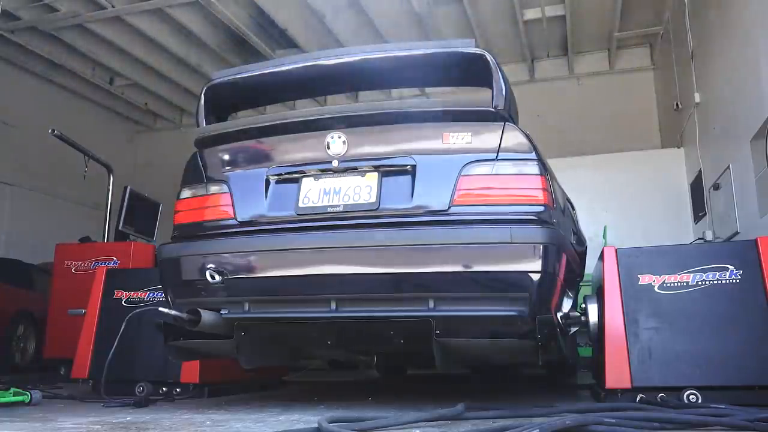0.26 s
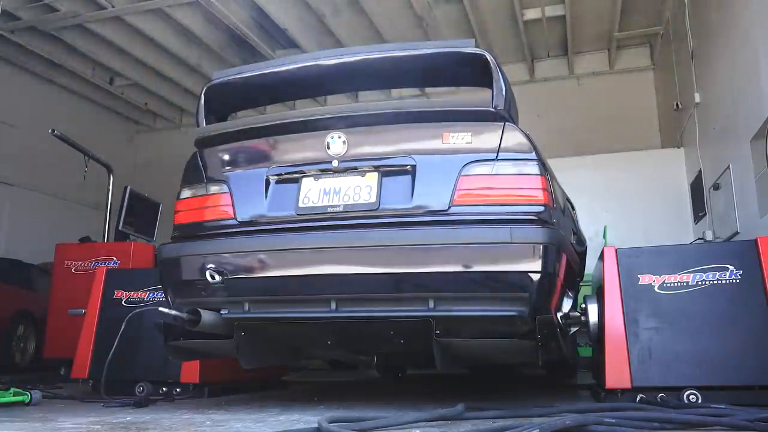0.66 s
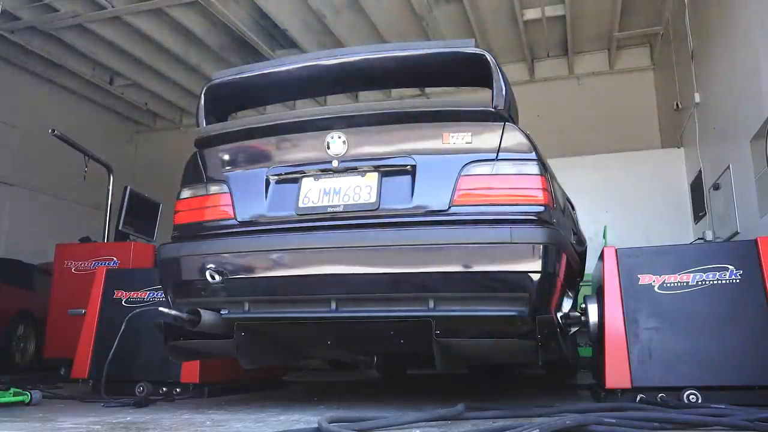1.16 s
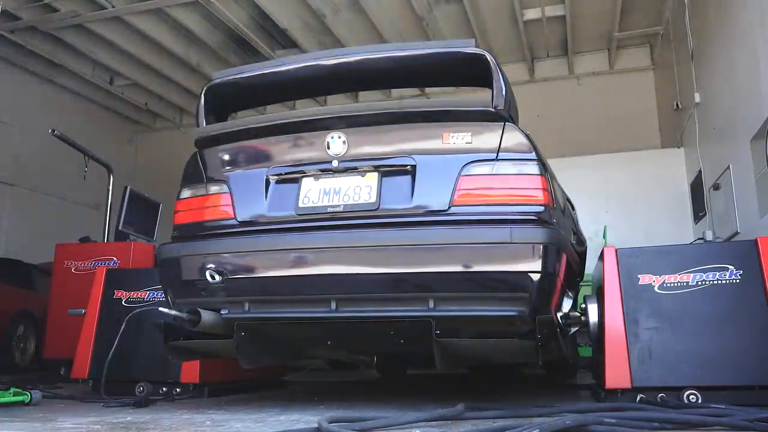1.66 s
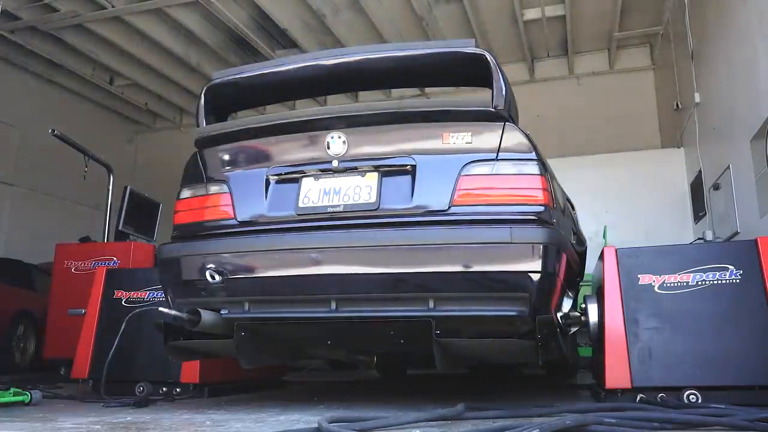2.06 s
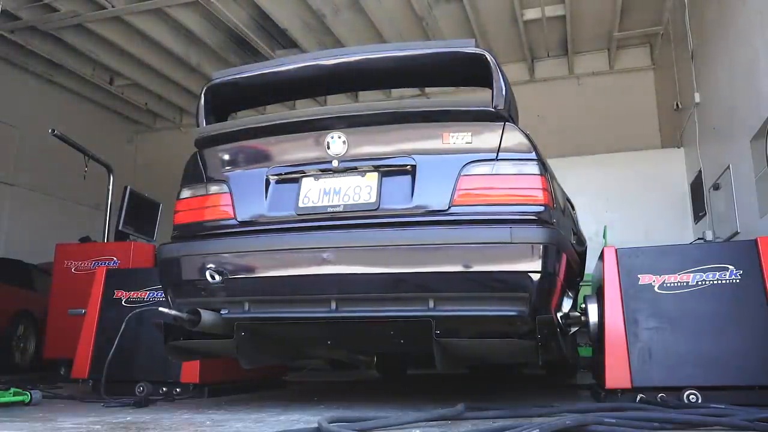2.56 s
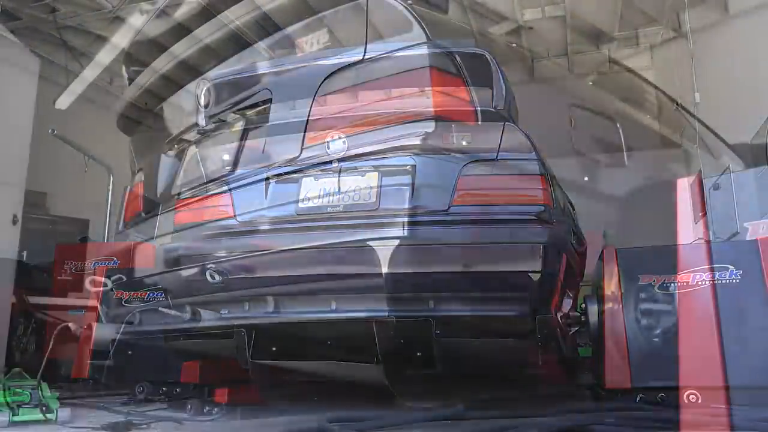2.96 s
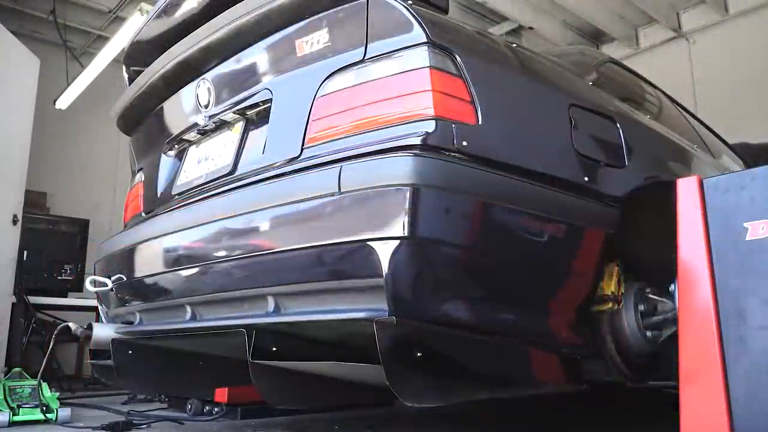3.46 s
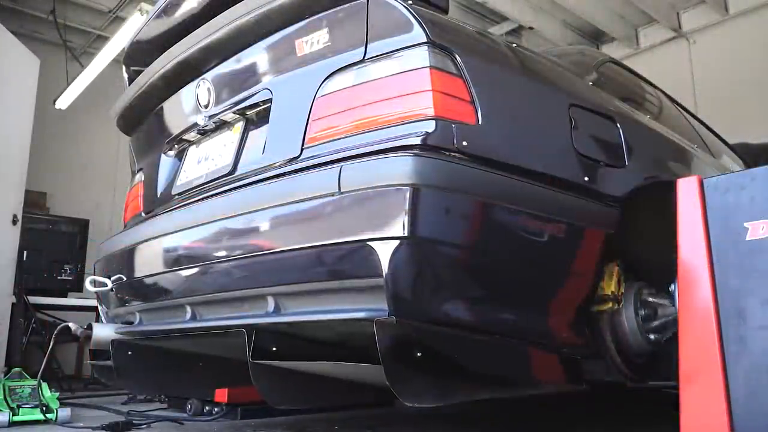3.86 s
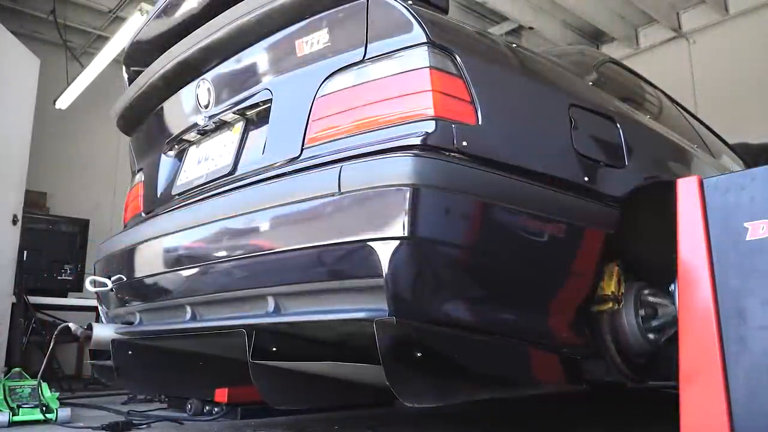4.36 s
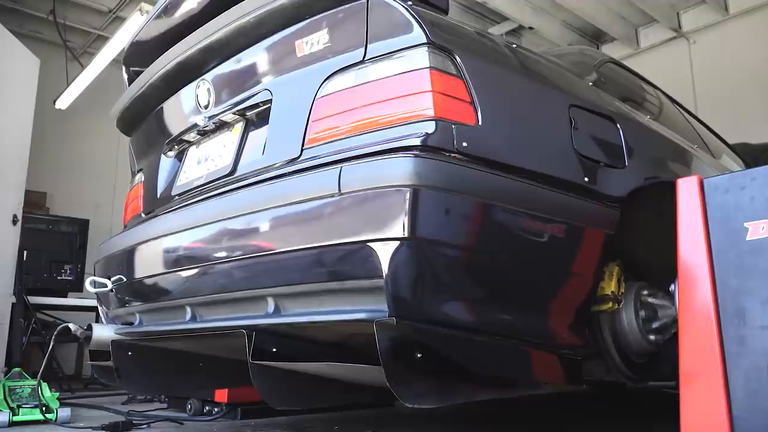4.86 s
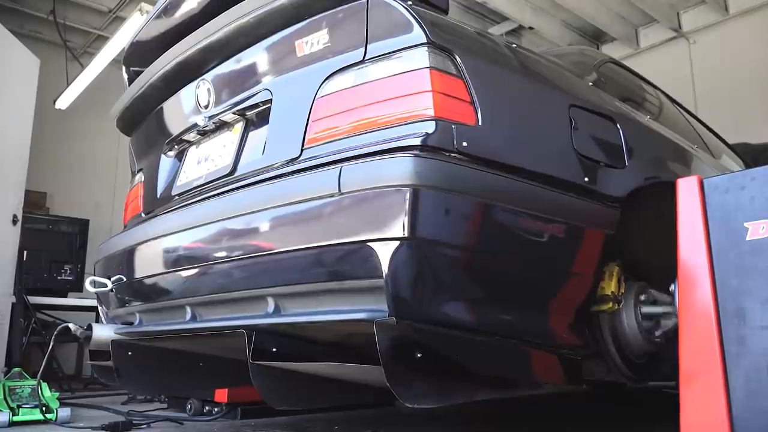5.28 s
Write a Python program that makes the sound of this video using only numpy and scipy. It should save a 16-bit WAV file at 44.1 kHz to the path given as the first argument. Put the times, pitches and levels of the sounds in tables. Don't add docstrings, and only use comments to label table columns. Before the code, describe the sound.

Close behind the tailpipe of a turbocharged six-cylinder car on a workshop dynamometer, with steady cooling-fan airflow underneath. From 0 s the loud exhaust note falls quickly, burbling unevenly, with dense dry crackles until about 1.2 s. A very faint high turbine tone slides down around 0.3-1.2 s, and tiny metallic ticks cluster near 1 s. By 1.5 s it is a low, lumpy idle with hollow pipe pops, soft wind thumps on the microphone, a heavy gust near 1.9 s and a faint motor whine rising and sinking at 1.6-2.4 s. Between 2.4 and 3.15 s a second, closer run crossfades in, with a few snaps around 3 s and a sharp one near 3.5 s. The smoother, fuller engine note climbs under load, hissing and buzzing, with hard cracks from 4 s and a brief gear whine around 4.4 s. It peaks at 4.75 s, roaring and clipped, then drops slightly and holds until the end at about 5.5 s.

```python
import sys
import numpy as np
from scipy import signal
from scipy.fft import rfft, irfft
from scipy.io import wavfile
from scipy.ndimage import map_coordinates

SR = 44100
rng = np.random.default_rng(int(sys.argv[2]) if len(sys.argv) > 2 else 0)


def invert_db(level):
    return 10 ** (np.asarray(level, dtype=float) / 20)


def master(y):
    cut = np.clip(np.atleast_2d(y).T, -1, 1)
    pcm = np.round(cut * 32767)
    wavfile.write(sys.argv[1], SR, pcm.astype(np.int16))


N = 243431
TIME = np.arange(N) / SR
MID_HZ, MID_DB = 100, -25


def unit(x):
    return x / np.sqrt(np.mean(x ** 2) + 1e-20)


def along(points, hz):
    point_hz, value = np.transpose(points)
    return np.interp(np.log(hz + 1), np.log(point_hz + 1), value)


def curves(rows):
    s, *columns = np.transpose(rows)
    return [np.interp(TIME, s, column) for column in columns]


def during(rows):
    inside_s = np.minimum(TIME - rows[0][0], rows[-1][0] - TIME)
    return np.clip(inside_s / 0.18, 0, 1)


def wobble(rate_hz):
    knots = rng.standard_normal(int(N * rate_hz / SR) + 4)
    return map_coordinates(knots, [TIME * rate_hz], order=1)


def coloured(x, spectrum):
    size = 2 ** 14
    gain = invert_db(along(spectrum, np.fft.rfftfreq(size, 1 / SR)))
    cepstrum = irfft(np.log(gain + 1e-6))
    cepstrum[1:size // 2] *= 2
    cepstrum[size // 2 + 1:] = 0
    return signal.fftconvolve(x, irfft(np.exp(rfft(cepstrum))))[:N]


def band(x, kind, hz):
    return signal.sosfiltfilt(signal.butter(2, hz, kind, fs=SR, output="sos"), x)


def running(rows):
    log_hz = curves([(s, np.log(hz)) for s, hz, _ in rows])[0]
    return np.exp(log_hz), curves(rows)[1]


def rings(events, t60_s, attack_s, rise=0):
    out, t = np.zeros(N + SR), np.arange(SR // 4) / SR
    bent = t - rise * 0.016 * (1 - np.exp(-t / 0.013))
    for s, db, hz in events:
        envelope = invert_db(db - 60 * t / t60_s) * (1 - np.exp(-t / attack_s))
        out[round(s * SR):][:len(t)] += envelope * np.sin(2 * np.pi * hz * bent)
    return out[:N]


def whistle(rows, blur_hz, rate_hz):
    hz, db = curves(rows)
    cycles = np.cumsum(hz + blur_hz * wobble(rate_hz)) / SR
    return during(rows) * invert_db(db + 4.5) * np.sin(2 * np.pi * cycles)


def snaps(events, shape, gain_db):
    s, db = np.transpose(events)
    pulses = np.bincount((s * SR).astype(int), invert_db(db + gain_db), N)
    around_s = np.arange(-SR // 100, SR // 100 + 1) / SR
    return signal.fftconvolve(pulses, shape(around_s), "same")


# start_s, second_share [0-1]
FADE = [(2.42, 0.02), (3.15, 0.94)]


def second_share():
    return curves(FADE)[0]


# freq_hz, t60_s
SHOP = [(100, 0.64), (1000, 0.37), (8000, 0.5)]


def shop(x):
    hz, t, z = signal.stft(rng.standard_normal(SR // 2), SR, nperseg=256)
    decay = invert_db(-60 * t / along(SHOP, hz)[:, None])
    tail = signal.istft(z * decay, SR, nperseg=256)[1]
    return signal.fftconvolve(x, tail / np.linalg.norm(tail))[:N]


# freq_hz, level_db [dB per Hz]
FANS = [(350, -32.5), (600, -5.5), (634, -6), (726, -28), (1230, -13.5), (1560, -10.5), (2070, -18),
        (2870, -17), (3120, -17.5), (3520, -14.5), (4260, -25.5), (5160, -23), (6860, -36.5), (7450, -29),
        (15500, -47)]


def fans():
    level_db = -53.5 + 0.65 * wobble(16)
    return invert_db(level_db) * unit(coloured(rng.standard_normal(N), FANS))


# start_s, peak_db, pitch_hz
TICKS = [(0.16, -55, 12500), (0.1925, -56, 12600), (0.9138, -47, 11400), (0.9921, -49, 11100),
         (1.0176, -48, 12500), (1.0735, -46, 11500), (1.1174, -57, 10900), (1.1613, -46, 11400),
         (1.3, -50, 8000), (1.385, -55, 8100)]


def ticks():
    return rings(TICKS, t60_s=0.01, attack_s=.0008)


# start_s, pitch_hz, level_db
WHINE = [(1.6, 500, -53), (1.72, 564, -40), (1.8, 592, -47), (1.95, 593, -52.5), (2.1, 542, -49),
         (2.25, 500, -54), (2.4, 473, -60)]


def absorber_whine():
    return whistle(WHINE, blur_hz=2.4, rate_hz=13)


# start_s, pitch_hz, level_db
GEAR = [(4.28, 1005, -43), (4.42, 1002, -26.5), (4.52, 1057, -40), (4.7, 1100, -39), (4.85, 1160, -45.5)]


def gear_whine():
    return invert_db(-2.5) * whistle(GEAR, blur_hz=14, rate_hz=40)


# start_s, pitch_hz, level_db
TURBINE = [(.3, 14400, -65), (.45, 14500, -63.5), (.55, 13750, -63), (.7, 13400, -67), (.83, 13150, -64),
           (1, 12900, -72), (1.25, 12500, -73)]


def turbine():
    return invert_db(-8.5) * whistle(TURBINE, blur_hz=300, rate_hz=1200)


# start_s [centre], level_db, width_s
BUFFET = [(0, -53, 0.041), (.12, -37.5, 0.023), (.57, -42.5, .1), (1.25, -34, 0.063), (1.43, -28.5, .05),
          (1.57, -32, .04), (1.88, -28.5, .12), (2.46, -29, 0.05), (2.58, -37, .06), (4.12, -35, 0.16)]
# start_s [centre], width_s, level_db
GUSTS = [(1.8765, .017, -7.3)]


def buffet():
    rumble = coloured(rng.standard_normal(N), [(8, -24.5), (18, 14), (40, 6.5), (60, -15.5), (200, -77)])
    gusts = sum(invert_db(db) * np.exp(-((TIME - s) / width) ** 2) for s, width, db in GUSTS)
    lumps = sum(invert_db(db) * np.exp(-((TIME - s) / width) ** 2) for s, db, width in BUFFET)
    second = second_share()
    loaded_db = -57 + 0.84 * (running(PULL)[1] - MID_DB)
    draught = (1 - second) * invert_db(-45) + second * invert_db(loaded_db)
    return invert_db(1.0) * (draught + lumps) * unit(rumble) + gusts


# start_s, peak_db, pitch_hz
POPS = [(1.492, -27, 465), (1.612, -28, 472), (1.724, -24.5, 475), (1.846, -31, 468), (1.965, -27, 470),
        (2.215, -37, 450), (2.463, -32, 468), (2.705, -28, 472)]


def idle_pops():
    return rings(POPS, t60_s=.17, attack_s=0.0049, rise=.12)


# start_s, peak_db
CRACKLE = [(0.041, -41), (0.091, -45.5), (0.124, -25.5), (0.163, -26.5), (0.203, -22), (0.255, -23.5),
           (0.352, -40), (0.379, -22.5), (0.42, -21), (0.456, -30), (0.475, -51), (0.534, -31.5),
           (0.593, -39), (0.614, -25), (0.676, -23), (0.761, -32), (0.831, -26.5), (0.88, -29.5),
           (0.914, -30.5), (1.005, -24.5), (1.033, -23.5), (1.088, -39), (1.131, -35), (1.179, -33.5),
           (2.881, -35), (3.015, -23), (3.045, -46), (3.099, -23), (3.121, -31), (3.483, -16.5)]


def crackle():
    def dip(t):
        rebound = .55 * np.exp(-((t - .0023) / .0006) ** 2)
        return rebound - np.exp(-np.abs((t - .001) / .00055) ** 1.7)
    return snaps(CRACKLE, dip, gain_db=10)


# start_s, peak_db
SHOCKS = [(.003, -34), (.011, -32.5), (.018, -23), (.033, -36), (.041, -29.5), (.119, -38), (.126, -37),
          (2.9865, -33), (4.0198, -26), (4.0722, -22.5), (4.107, -26), (4.134, -20), (4.1553, -33),
          (4.1738, -36), (4.2214, -20), (4.3291, -24), (4.3895, -25), (4.4334, -18), (4.4768, -20.5),
          (4.5185, -24.5), (4.6435, -51), (4.7232, -19), (4.7631, -13), (4.8884, -23.5), (5.0615, -33),
          (5.1288, -33), (5.22, -33), (5.4536, -33)]


def shocks():
    def jump(t):
        return np.tanh((t - .0012) / .00006) * np.exp(-np.abs(t - .0012) / 0.0011)
    return snaps(SHOCKS, jump, gain_db=6)


# freq_hz, level_db [dB per Hz]
HISS = [(410, -34.5), (700, -1), (767, 0.5), (861, -7), (1020, -2.5), (1150, -8.5), (1760, -11),
        (1900, -16), (2370, -17), (3150, -22), (6860, -31), (8660, -30.5), (10800, -40), (14000, -41.5),
        (15500, -46)]


def jet_hiss(rows, jet_db, grows, revs_db, air_db):
    firing_hz, flow_db = running(rows)
    firings = np.cumsum(firing_hz) / SR
    puff = invert_db(1.4 * np.cos(2 * np.pi * firings) + 0.91 * wobble(45) + 0.25 * wobble(18))
    hiss = coloured(puff * rng.standard_normal(N), HISS)
    hiss = hiss / np.std(band(hiss, "band", [2000, 9000]))
    hiss = hiss + (invert_db(air_db) - 1) * band(hiss, "high", 6000)
    level_db = jet_db + grows * (flow_db - MID_DB) + revs_db * np.log2(firing_hz / MID_HZ)
    return invert_db(level_db) * hiss


def uneven_firings(rows, spectrum, boom, uneven_db, smooths_db):
    firing_hz, flow_db = running(rows)
    fired = np.diff(np.floor(np.cumsum(firing_hz) / SR), prepend=0) > 0
    kicks = coloured(fired * rng.uniform(-1.32, 1, N) / np.sqrt(firing_hz), spectrum)
    kicks = kicks / np.std(band(kicks, "band", [250, 900]))
    kicks = kicks + (invert_db(along(boom, firing_hz)) - 1) * band(kicks, "low", 220)
    return invert_db(flow_db + uneven_db + smooths_db * np.log2(firing_hz / MID_HZ)) * kicks


CYLINDERS = [-2, -3.5, -7.5, -0.5, -7.5, -6.5]
STRONG = (6, 9, 12, 18, 15)


def orders(rows, spectrum, strong, waves, steady_db, bank_db, rough_db, sway_db, scatter, jitter, first_cycle):
    step = 10
    firing_hz, flow_db = [c[::step] for c in running(rows)]
    octaves = np.log2(firing_hz / MID_HZ)
    cycle_hz = firing_hz / len(CYLINDERS)
    cycles = first_cycle + np.cumsum(cycle_hz) * step / SR
    strong = dict(zip(STRONG, strong))

    def chance():
        return np.interp(cycles, np.arange(N // 500), rng.standard_normal(N // 500))

    tone = np.zeros((2, len(cycles)))
    for k in range(1, 60):
        banked = k % 3 == 0
        if k in strong:
            over_db, gained_db = strong[k]
            level_db = over_db + gained_db * octaves + along(waves, k * cycle_hz) + sway_db * chance()
        else:
            level_db = steady_db + CYLINDERS[k % len(CYLINDERS)] + along(spectrum, k * cycle_hz)
            level_db = level_db + rough_db * chance()
            if banked and k > len(CYLINDERS):
                level_db = level_db + bank_db
            if k < len(CYLINDERS):
                level_db = level_db - 13 - 14 * octaves
        start = rng.normal() * (scatter if banked else 1)
        turns = k * (cycles + jitter * (k not in strong) * chance()) + start
        tone[int(k in strong)] += invert_db(flow_db + level_db + 3.5) * np.sin(2 * np.pi * turns)
    return signal.resample_poly(tone, step, 1, axis=1)[:, :N]


# start_s, firing_hz, flow_db
OVERRUN = [(0, 133.7, -17.5), (.2, 118, -22.5), (.42, 106.4, -23.5), (.65, 96.1, -27), (.9, 80.98, -27),
           (1.2, 64.27, -34), (1.4, 56.27, -38), (1.6, 50.46, -42), (2.2, 47.56, -45), (3.1, 49.57, -45)]
# freq_hz, level_db [dB per Hz]
BURBLE = [(18, -25), (30, -21.5), (69, -8.5), (145, -1.5), (187, 0.5), (221, -9), (276, -3.5), (309, -22.5),
          (339, -7), (482, -9.5), (569, -21), (636, -21), (839, -35.5), (1150, -41.5), (2500, -45.5),
          (3250, -69), (5500, -120)]
# over_flow_db, gained_db [dB per octave of revs]
STRONG_OFF_LOAD = [(-0.5, 6), (-4.5, 20), (0, -9), (-3.5, -12.5), (-11, -5.5)]
# freq_hz, level_db
WAVES_OFF_LOAD = [(48, 1), (92, 0.5), (104, -6), (140, 7), (175, -4.5), (220, -14), (260, -4), (330, -20.5)]
# firing_hz, level_db
BOOM_OFF_LOAD = [(50, -0.5), (58, 15), (85, 5.5), (97, -8), (125, -0.5)]


def overrun():
    fade = np.sqrt(1 - second_share())
    tone = orders(OVERRUN, BURBLE, STRONG_OFF_LOAD, WAVES_OFF_LOAD, steady_db=-0.5, bank_db=2.5,
                  rough_db=4.5, sway_db=2.5, scatter=0.24, jitter=0.0077, first_cycle=0.0475)
    rough = uneven_firings(OVERRUN, BURBLE, BOOM_OFF_LOAD, uneven_db=-5.0, smooths_db=-0.7)
    rough = rough + jet_hiss(OVERRUN, jet_db=-56.5, grows=0.62, revs_db=-0.5, air_db=2.0)
    return tone * fade, rough * fade


# start_s, firing_hz, flow_db
PULL = [(2.42, 58.3, -53.5), (2.76, 66.68, -34.5), (3.04, 75.6, -29), (3.4, 86.03, -24),
        (3.66, 95.34, -22.5), (4.05, 114.2, -18), (4.44, 139.2, -16.5), (4.75, 150.9, -14.5),
        (4.9, 136.7, -16.5), (5.04, 131.6, -17.5), (5.2, 129.8, -17.5), (5.52, 129, -18)]
# freq_hz, level_db
PIPE = [(24, -68), (40, -35), (54, -31), (79, -19), (131, -7), (169, -5), (222, 3.5), (301, -6),
        (389, -10.5), (420, -21.5), (503, -4.5), (642, -21), (1030, -19), (1140, -20.5), (1500, -35),
        (1950, -48.5), (3300, -120)]
# over_flow_db, gained_db [dB per octave of revs]
STRONG_LOADED = [(-2, 2.5), (-4, 1), (2, -1.5), (2.5, 2), (-2, 6)]
# freq_hz, level_db
WAVES_LOADED = [(70, -5.5), (99, 3), (110, -6.5), (118, 0.5), (230, 1.5), (296, -9.5), (345, -6),
                (425, -12.5)]
# firing_hz, level_db
BOOM_LOADED = [(65, 18), (88, 6.5), (105, 10), (140, -43), (152, -6)]


def pull():
    second = second_share()
    tone = orders(PULL, PIPE, STRONG_LOADED, WAVES_LOADED, steady_db=-0.53, bank_db=1.5,
                  rough_db=1.7, sway_db=1.5, scatter=0.15, jitter=.0013, first_cycle=.1)
    rough = uneven_firings(PULL, PIPE, BOOM_LOADED, uneven_db=-10.5, smooths_db=0)
    rough = rough + jet_hiss(PULL, jet_db=-50.0, grows=0.87, revs_db=-2.8, air_db=1.0)
    return tone * np.minimum(4 * second, 1), rough * np.sqrt(second)


def steepened(x, lead_s):
    return np.interp(TIME, np.maximum.accumulate(TIME - lead_s * x), x)


def scene():
    falling_tone, falling_rough = overrun()
    loaded_tone, loaded_rough = pull()
    weak, strong = falling_tone + loaded_tone
    rough = falling_rough + loaded_rough
    pops, snapping = idle_pops(), crackle()
    direct = steepened(strong + invert_db(-4.5) * weak, lead_s=.00016) + rough + pops + snapping + shocks()
    to_room = invert_db(-4.0) * rough + invert_db(-9.0) * pops + invert_db(-13.0) * weak + invert_db(-6.5) * snapping
    small = ticks() + turbine() + absorber_whine() + gear_whine()
    return (direct + shop(to_room) + small + fans() + buffet())[None]


# start_s, level_db
CEILING = [(0, -10.5), (2.5, -10), (3.2, -7), (4.1, -7.5), (4.8, -10), (5.52, -10)]


def microphone(dry):
    top = invert_db(curves(CEILING)[0])
    clipped = np.clip(dry, -top, top)
    return signal.sosfilt(signal.butter(2, 24, "high", fs=SR, output="sos"), clipped)


def roll_off(x):
    return signal.sosfilt(signal.butter(12, 15680, fs=SR, output="sos"), x)


def record(dry):
    mix = microphone(dry)
    return roll_off(mix)


dry = scene()
out = record(dry)
master(out)
```